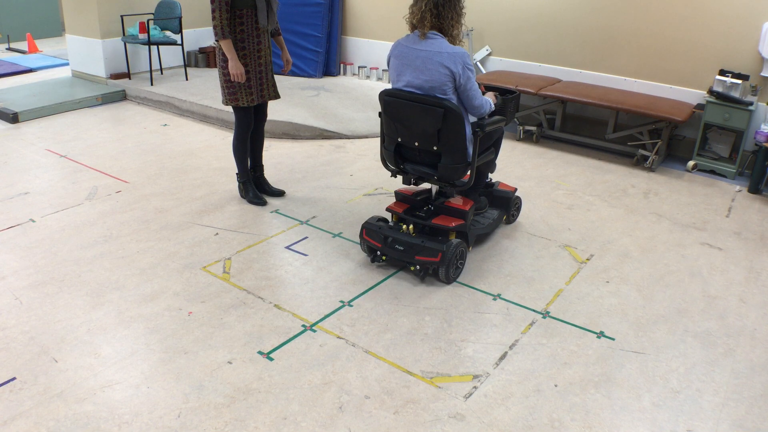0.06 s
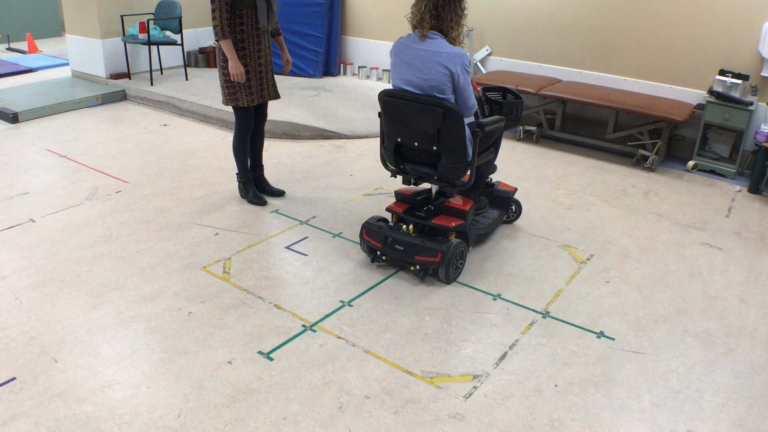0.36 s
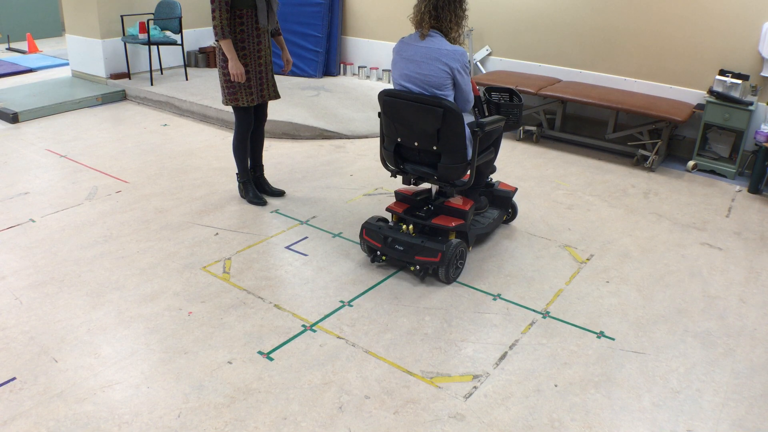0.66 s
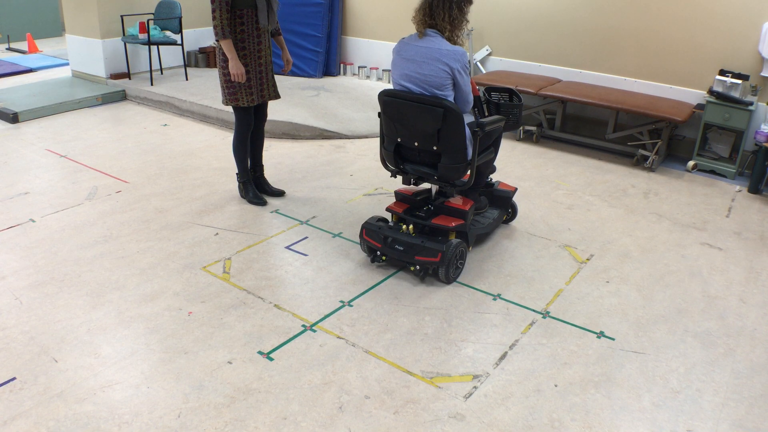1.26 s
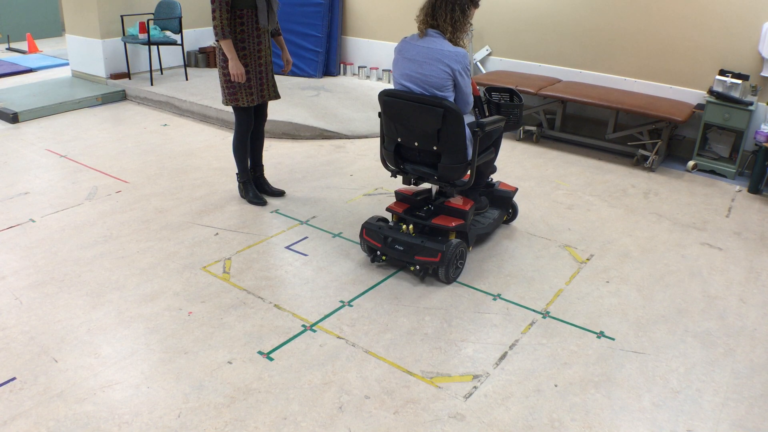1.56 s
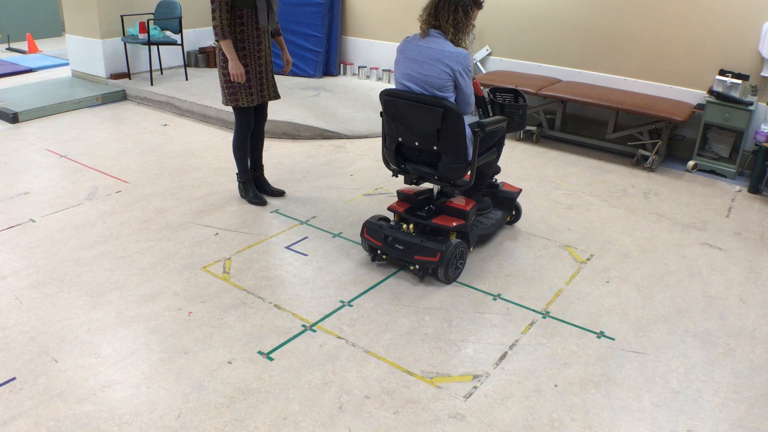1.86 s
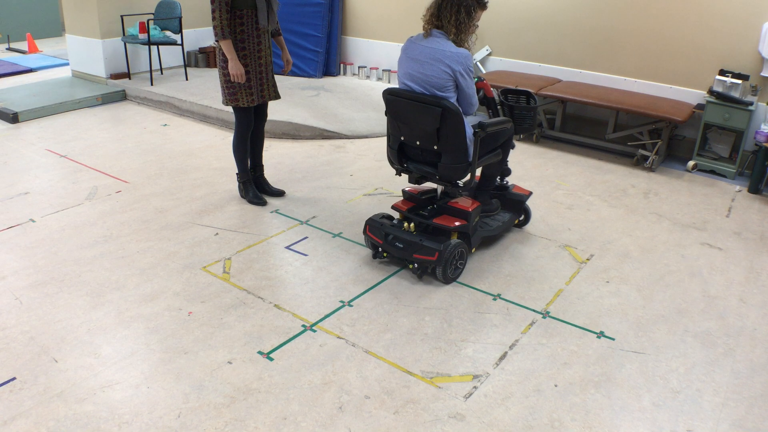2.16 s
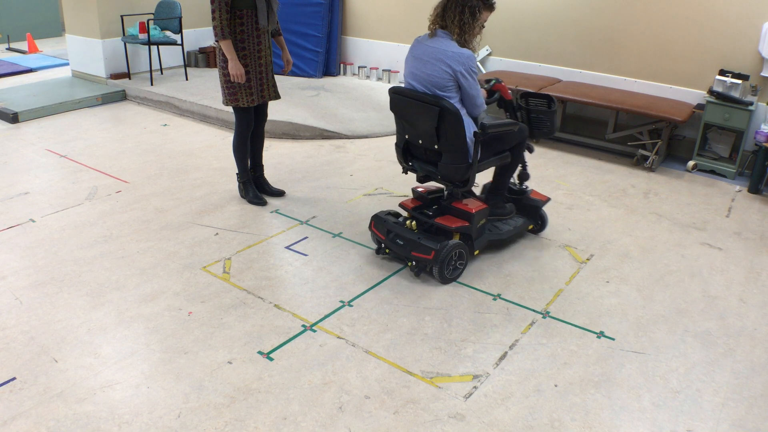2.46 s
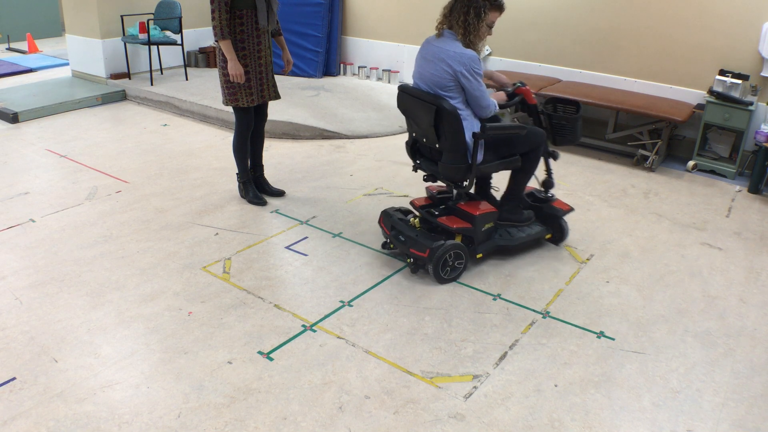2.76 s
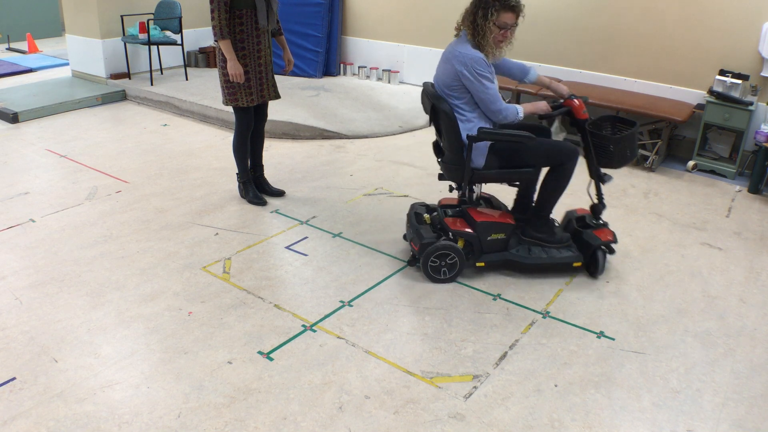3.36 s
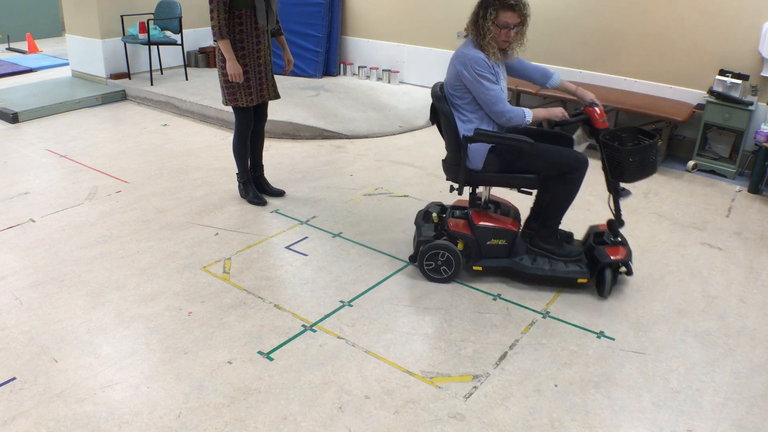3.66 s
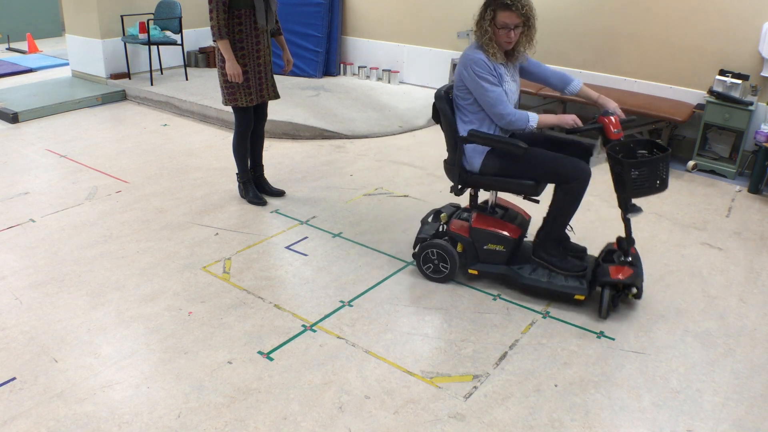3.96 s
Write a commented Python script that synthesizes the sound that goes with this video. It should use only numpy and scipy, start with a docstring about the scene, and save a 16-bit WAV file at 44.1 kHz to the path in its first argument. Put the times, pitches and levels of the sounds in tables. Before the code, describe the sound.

Mobility scooter turning slowly indoors, with a weak motor whirr, knocks and two sharp brake snaps.

```python
"""A large room with a hard floor, where a mobility scooter manoeuvres slowly, heard in mono.
Its weak motor whirrs and hisses as it rolls, small controls tick, seat and steering column knock,
the brake snaps twice and the tyres scrub in the turn. Each knock and snap rings on into the room.
In the background the ventilation hums and a low throb sweeps down about twice a second."""
import sys
import numpy as np
from scipy import signal
from scipy.fft import rfft, irfft
from scipy.io import wavfile

SR = 44100
rng = np.random.default_rng(int(sys.argv[2]) if len(sys.argv) > 2 else 0)


def to_wav(s):
    """Save 16-bit WAV."""
    ch = np.atleast_2d(s).T  # columns
    pcm = np.round(np.clip(ch, -1, 1) * 32767)  # PCM
    wavfile.write(sys.argv[1], SR, pcm.astype(np.int16))


N = 176400
T = np.arange(N) / SR
BIN_HZ = np.arange(N // 2 + 1) * SR / N
BASS_HZ, MIDDLE_HZ, TREBLE_HZ = 600, 2400, 9000

# The room's decay: frequency_hz, t60_s
ROOM_DECAY = [(250, 0.68), (600, 0.64), (1300, 0.32), (2600, 0.39), (5000, 0.36), (9000, 0.23),
              (15000, 0.27)]


def from_db(db):
    """Decibels to gain."""
    return 10 ** (np.asarray(db) / 20)


def at_hz(points, hz):
    """Read a table on a log-frequency axis."""
    point_hz, value = np.transpose(points)
    return np.interp(np.log(np.maximum(hz, 1)), np.log(point_hz), value)


def in_time(rows):
    """Each column of a curve at every sample."""
    time_s, *columns = np.transpose(rows)
    return [np.interp(T, time_s, column) for column in columns]


def add(out, start_s, sound):
    """Mix a sound in from start_s."""
    start = int(start_s * SR)
    out[start:start + len(sound)] += sound[:N - start]


def noise(colour):
    """Steady noise with a spectrum in dB per Hz."""
    return irfft(rfft(rng.standard_normal(N)) * from_db(at_hz(colour, BIN_HZ)), N) * np.sqrt(SR / 2)


def waver(width_hz):
    """Random drift in strength and phase: complex, rms about 1."""
    step, settle = 40, 2000
    pole = np.exp(-step * np.pi * width_hz / SR)
    white = rng.standard_normal((2, N // step + settle + 2))
    slow = signal.lfilter([1], [1, -2 * pole, pole * pole], white[0] + 1j * white[1])[settle:]
    return np.interp(np.arange(N) / step, np.arange(len(slow)), slow / np.std(slow))


def swell(length_s):
    """Time axis and a rounded rise and fall."""
    t = T[:int(length_s * SR)]
    return t, np.sin(np.pi * t / length_s)


def octaves(sound):
    """Split a sound into (centre_hz, band) pairs that add up to the whole."""
    centres = 250 * 2. ** np.arange(7)
    spectrum = rfft(sound)
    return [(hz, irfft(spectrum * at_hz(np.c_[centres, centres == hz], BIN_HZ), N)) for hz in centres]


def ripple(sound, depth_db, spacing_hz=68.2):
    """Dense small resonances at chance pitches, shallower in the bass."""
    peaks = np.interp(BIN_HZ / spacing_hz, np.arange(1024), rng.standard_normal(1024))
    gain = from_db(depth_db * np.clip(peaks, -2, 2) * np.minimum(BIN_HZ / MIDDLE_HZ, 1))
    return irfft(rfft(sound) * gain / np.sqrt(np.mean(gain ** 2)), N)


def blows(hits, colour, modes, ripple_db, crack_db, crack_s, attack_s, echo_s=0.0089, echo_db=-3):
    """Each blow is a crack, its first reflection, the room's tail and the body's ringing modes."""
    t, out = T[:SR], np.zeros(N)
    tone_hz = (BASS_HZ, MIDDLE_HZ, TREBLE_HZ)
    rise = np.minimum(t / attack_s, 1)
    crack_power = from_db(crack_db) ** 2 * np.exp(-t / crack_s)
    echo_power = from_db(echo_db) ** 2 * np.interp(t - echo_s, t, rise * crack_power, left=0)
    for hz, band in octaves(ripple(noise(colour), ripple_db)):
        tail_power = from_db(-60 * t / at_hz(ROOM_DECAY, hz)) ** 2
        shape = rise ** 2 * (crack_power + echo_power + tail_power)
        power = np.zeros(N)
        for start_s, *tone_db, _ in hits:
            add(power, start_s, shape * from_db(at_hz(np.c_[tone_hz, tone_db], hz)) ** 2)
        out += band * np.sqrt(power)
    for hz, level_db, t60_s in modes:
        ring = rise * from_db(level_db - 60 * t / t60_s) * np.exp(2j * np.pi * hz * t)
        rings = np.zeros(N, complex)
        for start_s, *tone_db, ring_db in hits:
            gain = from_db(ring_db + at_hz(np.c_[tone_hz, tone_db], hz))
            add(rings, start_s, gain * ring * np.exp(2j * np.pi * rng.random()))
        out += np.real(rings * (1 + waver(width_hz=39.8))) / np.sqrt(2)  # reflections make it beat
    return out


def ventilation():
    """Air rumbles in the background, with hums and faint whines, each part steady, part wavering."""
    # Room air: frequency_hz, density_db
    air = [(22, -114), (40, -84.5), (55, -83.5), (90, -78.5), (140, -78), (180, -74.5), (230, -86),
           (300, -87), (400, -95.5), (500, -103), (950, -104), (1280, -102), (1550, -114), (2100, -120),
           (3200, -125), (6000, -124), (7400, -128), (8800, -123), (12000, -128), (15000, -135)]
    # Hums and whines: pitch_hz, level_db, width_hz, wavering_share
    hums = [(40, -63, 5, 0.3), (74.05, -60.5, 8.6, 0.4), (112.2, -55.5, 16, 0.6), (798, -84.5, 9.9, .9),
            (1066, -79, 8.3, 0.2), (1190, -90, 13, .9), (10090, -93.5, 140, .6)]
    out = noise(air)
    for hz, level_db, width_hz, share in hums:
        strength = np.sqrt(1 - share ** 2) + share * waver(width_hz)
        tone = np.exp(2j * np.pi * (hz * T + rng.random()))
        out += np.sqrt(2) * from_db(level_db) * np.real(strength * tone)
    return out


def drive():
    """A rough whirr follows the motor's speed; gears sing and tyres hiss while the scooter rolls."""
    # Motor whirr: time_s, pitch_hz, level_db
    motor = [(0, 268, -62.5), (.25, 264, -56), (.6, 255, -68), (.9, 245, -81), (2.5, 320, -83),
             (2.72, 325, -67.5), (3.05, 320, -63), (3.25, 284, -63), (3.55, 280, -68), (3.76, 280, -59),
             (4, 283, -62.5)]
    # Gears and tyres rolling: time_s, gain_db
    rolling = [(0, -18), (.6, -7.5), (.9, -26), (2.2, -12), (2.6, -8), (2.9, -4), (3.3, 0), (3.6, -1.5),
               (4, 0.5)]
    # Rolling hiss: frequency_hz, density_db
    hiss_colour = [(200, -86), (380, -92.5), (500, -100), (900, -104), (1500, -115), (2500, -122),
                   (4100, -125), (4800, -118), (5400, -126), (6100, -117), (7200, -124), (8500, -111),
                   (9600, -113), (11000, -122), (13500, -123), (15000, -128)]
    roughness, flutter, gear_hz = 1.36, 0.13, 4760
    whirr_hz, whirr_db = in_time(motor)
    rolling_db, = in_time(rolling)
    turns = np.cumsum(whirr_hz) / SR
    whirr = np.real((1 + roughness * waver(width_hz=20.6)) * np.exp(2j * np.pi * turns))
    gears = from_db(-88) * np.real(waver(width_hz=290) * np.exp(2j * np.pi * gear_hz * T))
    hiss = noise(hiss_colour) * (1 + flutter * np.real(waver(width_hz=57)))
    return from_db(whirr_db) * whirr + from_db(rolling_db) * (gears + hiss)


def control_ticks():
    """Tiny bright contacts, over in a millisecond or two, with a tail from the room."""
    # Ticks of the controls: start_s, gain_db, tail_gain_db, top_gain_db
    ticks = [(.130, -19, 10, -14), (0.5351, 3, -19, -21), (0.541, -20, -13, -12), (2.326, -33, 9, 19),
             (2.7600, -8, 2.5, 11), (2.77, -9, -3, 13)]
    # A tick's spectrum: frequency_hz, density_db
    tick_colour = [(2500, -118), (3700, -102), (4600, -90), (6500, -93), (7600, -91), (9000, -78.5),
                   (11000, -94), (15000, -101)]
    contact_s, top_shelf_hz = 0.00061, (9500, 12500)
    t, out = T[:SR // 2], np.zeros(N)
    tail = from_db(-14 - 60 * t / at_hz(ROOM_DECAY, TREBLE_HZ))
    for start_s, gain_db, tail_db, top_db in ticks:
        colour = [(hz, db + np.interp(hz, top_shelf_hz, [0, top_db])) for hz, db in tick_colour]
        shape = np.sqrt(np.exp(-t / contact_s) + (from_db(tail_db) * tail) ** 2)
        add(out, start_s, from_db(gain_db) * shape * noise(colour)[:len(t)])
    return out


def throbs():
    """Behind the scooter, each low throb slides down in pitch and ends in a short boom."""
    # Throbs: start_s, sweep_gain_db, boom_gain_db
    pulses = [(0.237, 1.5, 1), (.665, 2.5, -2), (1.125, 0, -0.5), (1.574, -0.5, 1.5), (2.029, 3, -9),
              (2.485, 1.5, -1.5), (2.941, 3, 2), (3.375, -1, -4), (3.825, 1, 1.5)]
    start_hz, fall_hz_per_s, roughness = 202.8, 254, 0.6
    boom_hz, boom_delay_s = 112.3, 0.115
    sweeps, booms = np.zeros(N, complex), np.zeros(N)
    for start_s, sweep_db, boom_db in pulses:
        t, shape = swell(length_s=0.2)
        turns = start_hz * t - fall_hz_per_s * t ** 2 / 2 + rng.random()
        add(sweeps, start_s, from_db(sweep_db - 49) * shape * np.exp(2j * np.pi * turns))
        t, shape = swell(length_s=0.12)
        boom = shape * np.sin(2 * np.pi * (boom_hz * t + rng.random()))
        add(booms, start_s + boom_delay_s, from_db(boom_db - 45.5) * boom)
    return np.real(sweeps * (1 + roughness * waver(width_hz=65))) + booms


def frame_knocks():
    """Seat and steering column knock and set the frame ringing."""
    # Knocks: start_s, bass_db, middle_db, treble_db, extra_ring_db
    knocks = [(.262, -2, 3.5, 1.5, 0), (.369, -5.5, -11.5, -12, 5.5), (.420, -13, -7, -31, -2),
              (.461, -2, -12, -6, 0.5), (.508, -15, -7.5, -31, -2), (.568, -0.5, -19.5, -25, -3.5),
              (.708, -11.5, -15, -28, -4), (1.6255, -14, -10, -9, -14), (1.7955, -0.5, -8, -7.5, -1),
              (1.945, -5, -33, -23, -4.5), (2.632, -6, -32, -24, 1.5), (3.443, -12, -35, 3, 3)]
    # A knock's spectrum: frequency_hz, density_db
    colour = [(200, -83), (350, -84.5), (480, -89), (750, -85), (1400, -89), (2200, -99), (3300, -105.5),
              (4500, -107), (7000, -116), (8600, -107), (10500, -116), (15000, -122)]
    # Modes of the frame: pitch_hz, level_db, t60_s
    modes = [(325, -49, 0.3), (371.5, -56, 0.57), (693, -58.5, 0.14), (841, -56.5, 0.3), (1246, -55.5, .1),
             (1726, -57, 0.052), (3235, -71, .36)]
    return blows(knocks, colour, modes, ripple_db=1, crack_db=-1, crack_s=0.0077, attack_s=0.0037)


def brake_snaps():
    """The brake snaps twice in quick succession and its housing rings."""
    # Snaps: start_s, bass_db, middle_db, treble_db, extra_ring_db
    snaps = [(1.2982, -13, -20.5, -17, 4.5), (1.3762, -3, -5, -5.5, -1.5)]
    # A snap's spectrum: frequency_hz, density_db
    colour = [(300, -90), (440, -85.5), (540, -68.5), (700, -72.5), (1150, -65), (1500, -72), (2000, -78),
              (3100, -80.5), (5200, -92), (7000, -87), (9000, -80.5), (11500, -81.5), (14200, -92),
              (15500, -99)]
    # Modes of the brake housing: pitch_hz, level_db, t60_s
    modes = [(529, -46.5, 0.28), (665, -44, 0.27), (852, -45.5, 0.32), (1004, -48, 0.1), (1211, -32, 0.29),
             (1230, -49, 0.42), (1443, -52.5, 0.86), (1624, -31, 0.039), (1930, -34.5, 0.038),
             (2480, -51.5, 0.51), (2630, -59, 0.58), (2990, -45, 0.064), (3280, -53, 0.27),
             (6200, -54, 0.24), (8170, -54, 0.34), (9631, -59, 0.31), (10250, -58, 0.2), (11100, -53, 0.26),
             (11500, -54, 0.28)]
    return blows(snaps, colour, modes, ripple_db=1.5, crack_db=5, crack_s=0.0079, attack_s=0.0033)


def tyre_scrubs():
    """Rubber twists on the floor in soft swells as the scooter turns."""
    # Scrubs: start_s, length_s, gain_db
    scrubs = [(2.586, 0.15, -8.5), (2.985, 0.13, -11.5), (3.421, 0.11, -10.5)]
    # Rubber on the floor: frequency_hz, density_db
    colour = [(200, -100), (380, -78.5), (480, -87.5), (700, -85), (950, -84.5), (1400, -105), (2500, -120),
              (6000, -135)]
    level = np.zeros(N)
    for start_s, length_s, gain_db in scrubs:
        add(level, start_s, from_db(gain_db) * swell(length_s)[1])
    return level * noise(colour)


def scene():
    """The scooter over the room's background, at one microphone."""
    scooter = brake_snaps() + frame_knocks() + control_ticks() + drive() + tyre_scrubs()
    return (scooter + throbs() + ventilation())[None]


def record(dry):
    """The top is cut steeply above 15.6 kHz."""
    return signal.sosfilt(signal.ellip(10, .1, 80, 15600, fs=SR, output="sos"), dry)


dry = scene()
out = record(dry)
to_wav(out)
```